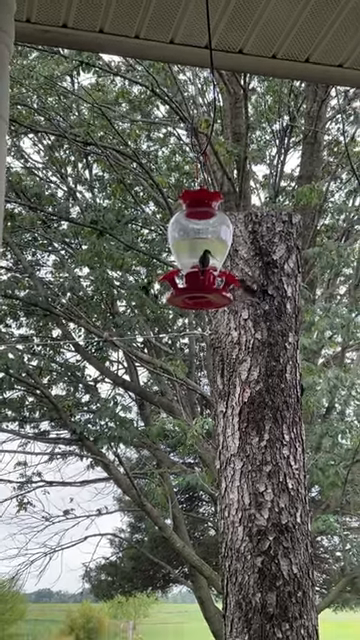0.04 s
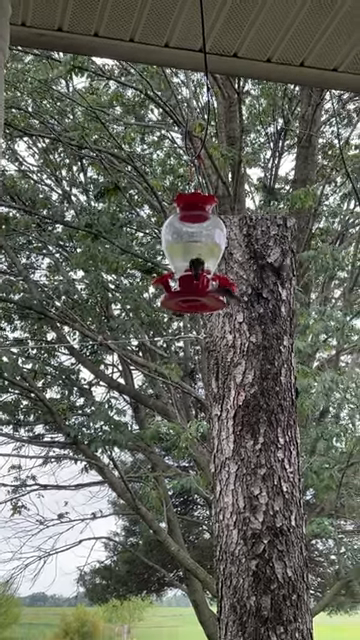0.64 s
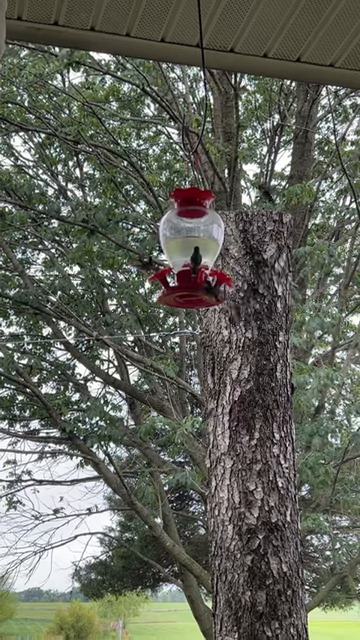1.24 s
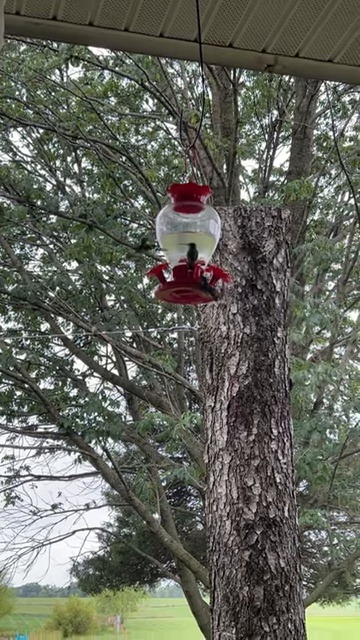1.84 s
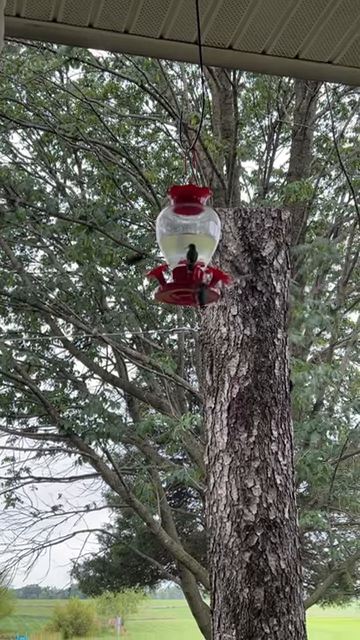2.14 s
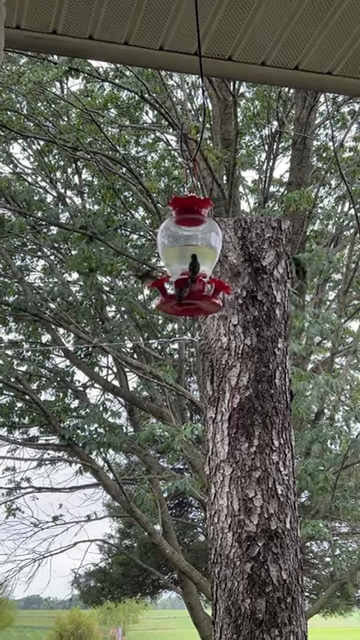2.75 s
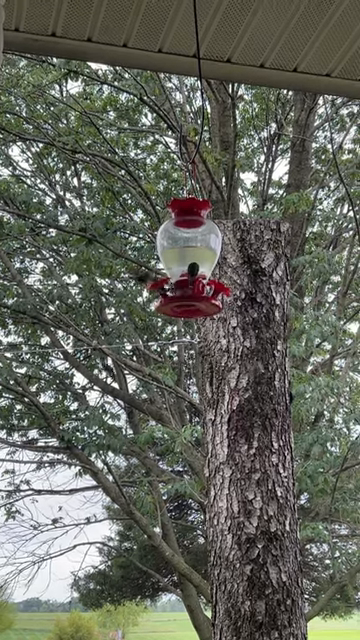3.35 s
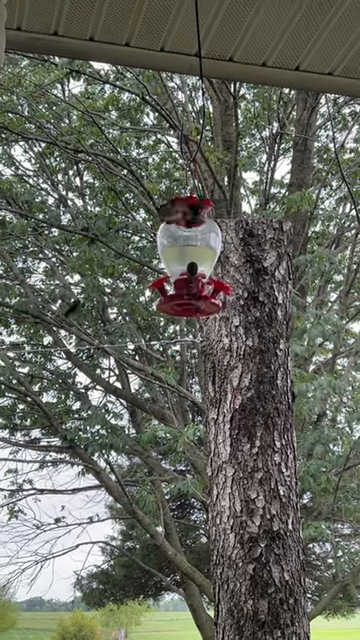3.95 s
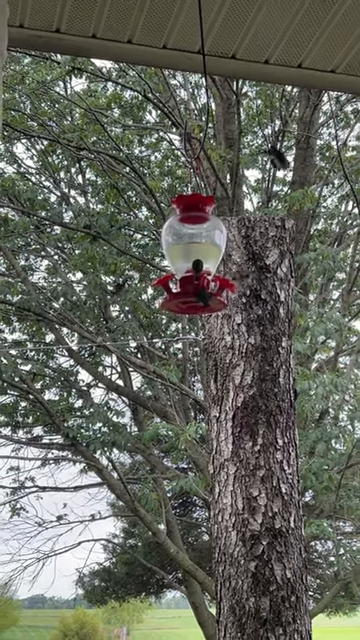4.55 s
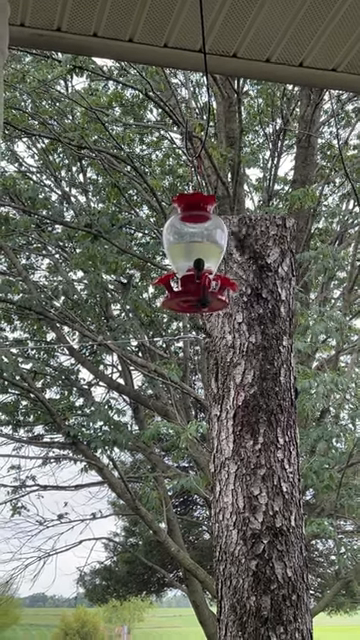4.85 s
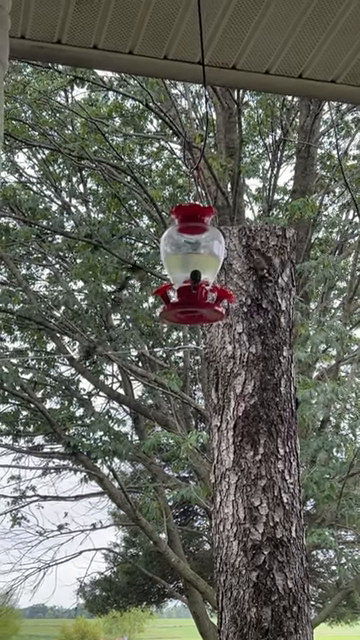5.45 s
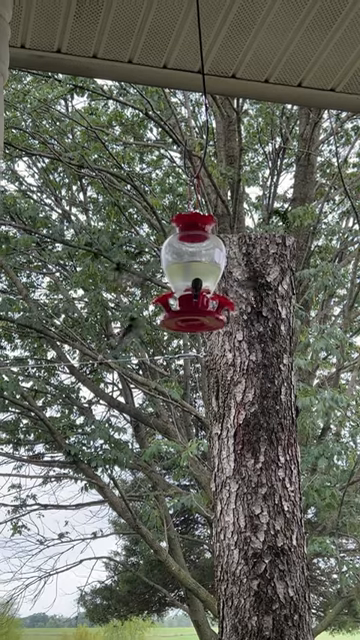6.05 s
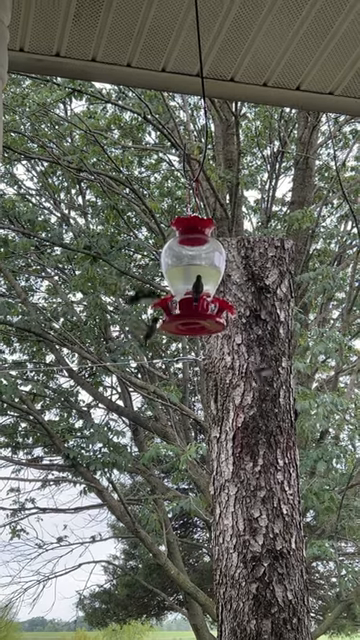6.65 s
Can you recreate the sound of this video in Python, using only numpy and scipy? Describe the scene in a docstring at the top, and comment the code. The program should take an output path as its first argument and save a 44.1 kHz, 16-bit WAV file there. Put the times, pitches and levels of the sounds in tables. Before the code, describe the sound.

Several hummingbirds hover close to the microphone on a porch, their wings making a low, wavering hum that swells with a soft swish as they dart past. They trade thin high squeals, raspy scolds and quick chips, which get busier in the second half. Insects shrill steadily in the trees, and a farther bird whistles briefly midway.

```python
"""At the edge of a porch roof, hummingbirds crowd a hanging feeder.
Insects shrill in the trees, a soft rush comes and goes, and another bird whistles farther off.
Many wings beat at slightly different rates, making a wavering hum and a swish of feathers.
The birds squeal, rasp and chip at each other, and the porch adds a short echo to the calls.
About half a second in, the whole sound drops out for an instant."""
import sys
import numpy as np
from scipy import signal
from scipy.fft import rfft, irfft
from scipy.io import wavfile
from scipy.ndimage import map_coordinates

SR = 44100
rng = np.random.default_rng(int(sys.argv[2]) if len(sys.argv) > 2 else 0)


def wav_out(sig):
    """Save sig, one row per channel (or a flat mono array), as 16-bit PCM at SR to the path in sys.argv[1]."""
    wavfile.write(sys.argv[1], SR, np.round(np.clip(np.atleast_2d(sig).T, -1, 1) * 32767).astype(np.int16))


N = 296352
TIME = np.arange(N) / SR
TREBLE_LIMIT_HZ = 15700


def gain_of(db):
    """Turns decibels into a number to multiply a sound by."""
    return 10 ** (np.asarray(db) / 20)


def unit_level(x):
    """Scales a sound to an average (rms) level of one."""
    return x / np.sqrt(np.mean(x ** 2) + 1e-20)


def level_at(colour, hz):
    """Looks up the decibels at a frequency in a table of tone colour."""
    table_hz, db = np.transpose(colour)
    return np.interp(np.log(hz + 1), np.log(table_hz + 1), db)


def follow(rows):
    """Joins a table's points in time with straight lines, one curve per column."""
    times, *columns = np.transpose(rows)
    return [np.interp(TIME, times, column) for column in columns]


def add(mix, start_s, sound):
    """Mixes a sound in at its start time."""
    part = mix[max(round(start_s * SR), 0):][:len(sound)]
    part += sound[:len(part)]


def drift(rate_hz, size=N):
    """A random wander of about plus or minus one that turns rate_hz times a second."""
    points = rng.standard_normal(2048)
    position = np.arange(size) * rate_hz / SR
    return map_coordinates(points, [position], order=1, mode="wrap") * np.sqrt(3 / 2)


def coloured(x, colour):
    """Gives a sound a tone colour, at an average level of one."""
    hz = np.fft.rfftfreq(len(x), 1 / SR)
    return unit_level(irfft(rfft(x) * gain_of(level_at(colour, hz)), len(x)))


def noise(colour, size=N):
    """Steady noise with a tone colour."""
    return coloured(rng.standard_normal(size), colour)


def porch_echo(x, echo_db, decay_s, dull_hz=9000, bounce_db=-13):
    """Adds three early bounces off roof and wall, then a short, duller tail."""
    t = np.arange(SR // 2) / SR
    clicks = rng.choice([-1, 1], len(t)) * (rng.random(len(t)) < 2000 / SR)
    tail = clicks * (t > .004) * gain_of(-60 * t / decay_s)
    tail /= np.linalg.norm(tail)
    echo = gain_of(echo_db) * signal.lfilter(*signal.butter(1, dull_hz, fs=SR), tail)
    for delay_s in rng.uniform(.005, .024, size=3):
        echo[round(delay_s * SR)] += gain_of(bounce_db)
    return x + signal.fftconvolve(x, echo)[:N]


# How loud the faraway rush is: time_s, level_db
RUSH_LOUDNESS = [(0, -73.5), (.4, -68.5), (1.2, -85), (2.7, -95), (3.4, -71), (4.5, -92.5), (6.72, -76.5)]

def distant_rush(hz=950):
    """A soft band of noise from far away that comes and goes."""
    db, = follow(RUSH_LOUDNESS)
    band = [(hz / 2, -35), (hz * .85, -3), (hz * 1.1, 0), (hz * 1.2, -20), (hz * 3, -60)]
    return gain_of(db) * noise(band)


# Tone colour of the insects: frequency_hz, relative_db
INSECT_COLOUR = [(4000, -43), (5500, -15.5), (6400, -11), (6950, 1), (7150, -2.5), (7380, 1), (7750, -1.5),
                 (8200, -9), (8550, -8.5), (9500, -21.5), (11000, -45), (13700, -30), (14600, -26),
                 (15600, -32)]
# How their loudness changes: time_s, relative_db
INSECT_LOUDNESS = [(0, -61), (3, -62), (6.72, -62.5)]

def insects(chorus_db=6, singer_db=-3, singer_hz=7390, flicker_db=1.3):
    """A shrill chorus, with one nearer singer pulsing through it."""
    db, = follow(INSECT_LOUDNESS)
    chorus = noise(INSECT_COLOUR) * gain_of(chorus_db + flicker_db * drift(40))
    throb_hz = 24.8 * (1 + .04 * drift(4))
    throb = (1 + np.cos(2 * np.pi * np.cumsum(throb_hz) / SR)) ** 2
    # a narrow band of noise around the singer's pitch
    shrill = (drift(230) + 1j * drift(230)) * np.exp(2j * np.pi * singer_hz * TIME)
    return gain_of(db) * (chorus + gain_of(singer_db) * unit_level(throb * shrill.real))


def bird_note(pitch_hz, db, octave_db, waver, flutter_db, crack_hz):
    """A fluttering tone and its octave; pushed below crack_hz, it turns hoarse."""
    size = len(pitch_hz)
    hoarse = .05 * np.clip(10 * (1 - pitch_hz / crack_hz), 0, 1)
    jitter = waver * drift(400, size) + hoarse * drift(1200, size)
    phase = 2 * np.pi * np.cumsum(pitch_hz * (1 + jitter)) / SR
    level = gain_of(db + flutter_db * drift(135, size)) * signal.windows.tukey(size, .3)
    return level * (np.sin(phase) + gain_of(octave_db) * np.sin(2 * phase))


# A whistled phrase: start_s, length_s, first_hz, middle_hz, last_hz, relative_db
WHISTLE_NOTES = [(3.508, 0.082, 3070, 2475, 2340, -53.5), (3.599, 0.105, 2320, 2410, 2420, -58.5),
                 (3.75, 0.107, 2280, 2415, 2580, -62.5)]

def far_whistles():
    """A farther bird whistles one falling note, then two gently rising ones."""
    out = np.zeros(N)
    for start_s, length_s, *pitches_hz, db in WHISTLE_NOTES:
        curve = np.polyfit([0, .5, 1], pitches_hz, 2)
        pitch_hz = np.polyval(curve, np.linspace(0, 1, round(length_s * SR)))
        note = bird_note(pitch_hz, db, octave_db=-28, waver=.01, flutter_db=3, crack_hz=2200)
        add(out, start_s, note)
    return out


def far_chips(chips_per_s=7):
    """Faint, random chatter from birds waiting in the trees."""
    out = np.zeros(N)
    for when, high, loud in rng.random((round(chips_per_s * N / SR), 3)):
        db = -66 + 8 * (loud - .5)
        add(out, when * N / SR, chip(hz=1700 * 2.5 ** high, db=db, ring_db=db - 10))
    return out


def wings(beat_hz, tones_db, wander, shimmer):
    """Wings hum at whole multiples of their beat; each tone swells and fades as the bird turns."""
    step = 10  # low tones need only every tenth sample
    wavering_hz = beat_hz * (1 + wander * (drift(6) + 1.4 * drift(22)))
    beats = np.cumsum(wavering_hz)[::step] / SR
    hum = 0
    for k, db in enumerate(tones_db, 1):
        facing = 1 + shimmer * drift(9 * step, len(beats))
        hum += gain_of(db) * facing * np.sin(2 * np.pi * (k * beats + rng.random()))
    return unit_level(signal.resample_poly(hum, step, 1)[:N])


# Birds darting past: closest_s, half_power_s (sign ignored), hum_relative_db, swish_relative_db
FLY_PASTS = [(.03, 0.35, -69, -66), (.25, 1.7, -57.5, -72), (.62, 0.09, -52.5, -60), (.85, -0.03, -51, -75),
             (.87, -0.06, -50.5, -87), (1.7, 0.16, -53, -71), (1.86, 0.14, -53.5, -60.5),
             (2.5, 0.25, -52, -67.5), (3.06, 0.09, -54.5, -61.5), (3.66, 0.12, -52, -64.5),
             (4.08, 0.11, -57, -59.5), (4.38, 0.03, -52.5, -69), (5.0, 0.09, -53, -61),
             (5.4, 0.2, -52.5, -64), (6.62, 0.3, -51, -64.5)]

def fly_past_levels(hum_floor_db=-55.5, swish_floor_db=-90):
    """Hum and swish in decibels as birds fly straight past: twice as far, a quarter of the power."""
    hum_power, swish_power = gain_of(hum_floor_db) ** 2, gain_of(swish_floor_db) ** 2
    for closest_s, half_power_s, hum_db, swish_db in FLY_PASTS:
        distance_squared = 1 + ((TIME - closest_s) / half_power_s) ** 2
        hum_power += gain_of(hum_db) ** 2 / distance_squared
        swish_power += gain_of(swish_db) ** 2 / distance_squared
    return 10 * np.log10(hum_power), 10 * np.log10(swish_power)


# The usual wingbeat of each bird in the flock: beat_hz
FLOCK_BEATS = [42.76, 46.73, 49.4, 51.83, 53.1, 56.8, 60.47]
# Tone colour of their hum: frequency_hz, relative_db
HUM_COLOUR = [(35, -42), (52, -9.5), (95, 4.5), (150, -1.5), (210, 2.5), (380, -3), (520, -11.5),
              (900, -39)]
# Tone colour of the air they stir: frequency_hz, relative_db
AIR_COLOUR = [(30, -34), (60, 3), (130, 2), (330, 3), (480, -6.5), (680, -14.5), (1300, -19.5),
              (15500, -54)]

def flock(trim_db=-2.5, air_db=-59.5, air_swell=1.95):
    """Many wingbeats drift in and out of step; the rush of air swells as birds pass."""
    db, _ = fly_past_levels()
    multiples = np.arange(1, 17)
    hum = sum(wings(hz, level_at(HUM_COLOUR, hz * multiples), wander=.025, shimmer=.49)
              for hz in FLOCK_BEATS)
    air = gain_of(air_db + air_swell * (db - db.mean())) * noise(AIR_COLOUR)
    return gain_of(db + trim_db) * unit_level(hum) + air


# A bird hovering close by: time_s, beat_hz, relative_db
NEAR_HOVER = [(0, 52.1, -65), (2.25, 46.5, -58.5), (2.9, 49.6, -59), (3.4, 53, -63), (4.05, 53.97, -58.5),
              (4.8, 53.23, -57), (5.5, 52.3, -60), (6.3, 54.8, -57), (6.72, 55.65, -62)]
# The tones in its hum: multiple_of_beat, relative_db
NEAR_TONES = [(1, -23), (2, -0.5), (3, 1.5), (4, 6.5), (5, -14), (7, -13.5), (10, -18), (14, -52)]
# A second bird with a deeper hum: time_s, beat_hz, relative_db
DEEP_HOVER = [(0, 53, -73), (2.05, 57.2, -68), (3.5, 58.2, -69), (4.4, 57.7, -61), (6.72, 53, -63)]

def near_birds(trim_db=-1, deep_db_per_octave=-9):
    """The two closest birds hum, each changing its wingbeat and loudness as it hovers."""
    multiples = np.arange(1, 15)
    near_hz, near_db = follow(NEAR_HOVER)
    deep_hz, deep_db = follow(DEEP_HOVER)
    near = wings(near_hz, level_at(NEAR_TONES, multiples), wander=.025, shimmer=.41)
    deep = wings(deep_hz, deep_db_per_octave * np.log2(multiples), wander=.015, shimmer=.28)
    return gain_of(near_db + trim_db) * near + gain_of(deep_db + trim_db) * deep


# Tone colour of swishing feathers: frequency_hz, relative_db
SWISH_COLOUR = [(400, -25), (700, 4), (1300, 1), (2100, 0.5), (3200, 1), (5000, 2.5), (9000, -5),
                (15000, -12)]

def feathers(trim_db=-1, pulse_depth=.19, flicker_db=1):
    """A faint swish on every wing stroke, strongest when a bird darts past."""
    _, db = fly_past_levels()
    beat_hz, _ = follow(NEAR_HOVER)
    strokes = unit_level(1 + pulse_depth * np.cos(2 * np.pi * np.cumsum(beat_hz) / SR))
    return gain_of(db + trim_db + flicker_db * drift(23)) * strokes * noise(SWISH_COLOUR)


# Birds swerving close by: loudest_s, swell_s, strongest_tone_hz, level_db
CLOSE_SWERVES = [(.74, .1, 110, -55.5), (2.779, 0.048, 289, -53.5), (4.019, 0.056, 212.7, -49.5),
                 (4.43, .06, 211, -53), (4.881, 0.039, 220.4, -53.5), (5.27, 0.065, 109.3, -51.5),
                 (5.679, 0.061, 300, -53.5), (6.22, .06, 218.3, -55)]

def swerves(rough_beat_hz=53, pitch_bend=.02, neighbour_db=-9):
    """The hum swells with one tone standing out, and its pitch falls as the bird turns away."""
    out = np.zeros(N)
    for loudest_s, swell_s, hz, db in CLOSE_SWERVES:
        path = np.linspace(-3, 3, round(6 * swell_s * SR))  # zero is the closest point
        strongest = round(hz / rough_beat_hz)
        beat_hz = hz / strongest * (1 - pitch_bend * np.tanh(path) + .04 * drift(18, len(path)))
        beats = np.cumsum(beat_hz) / SR
        flutter = unit_level(1 + .55 * drift(24, len(path)))
        hum = 0
        for k in range(2, 9):
            strength = gain_of(neighbour_db * abs(k - strongest))
            hum += strength * np.sin(2 * np.pi * (k * beats + rng.random()))
        swell = gain_of(db) * np.exp(-path ** 2)
        add(out, loudest_s - 3 * swell_s, swell * flutter * unit_level(hum))
    return out


# Thin squeals: start_s, length_s, pitch_hz, glide_hz_per_s, relative_db, octave_db
SQUEAL_CALLS = [(0.049, 0.032, 7330, 2491, -41, -20.5), (0.085, 0.046, 7330, -6000, -40.5, -26),
                (0.265, 0.096, 7100, -300, -33, -10.5), (0.939, 0.063, 7780, -500, -44, -32),
                (1.737, 0.096, 7400, -3000, -45, -9), (2.462, 0.088, 5780, -4000, -47, -26),
                (2.541, 0.14, 5390, -900, -57, -16), (2.863, 0.062, 6800, -6000, -49.5, -11),
                (3.77, .12, 7190, -1200, -47, -10), (3.988, 0.045, 7720, -1500, -45, -28),
                (4.022, 0.06, 6760, 498, -44, -17), (4.635, 0.027, 5050, 3507, -41.5, -23),
                (5.579, 0.027, 5000, 16982, -54, -23), (5.618, 0.046, 5220, 9000, -47.5, -20),
                (6.212, 0.046, 7080, 3508, -35.5, -4), (6.269, 0.031, 7070, -2000, -33, -13.5),
                (6.675, 0.054, 6180, 27994, -46.5, -9)]

def squeals(peak_at=.42, pitch_sag=.0155, ends_db=-11):
    """Pitch and loudness rise and fall in one arch, on top of each squeal's own glide."""
    out = np.zeros(N)
    for start_s, length_s, hz, glide, db, octave_db in SQUEAL_CALLS:
        progress = np.linspace(0, 1, round(length_s * SR))
        off_peak = np.interp(progress, [0, peak_at, 1], [1, 0, 1])
        pitch_hz = hz * (1 - pitch_sag * off_peak ** 2) + glide * length_s * (progress - .5)
        arch_db = db + ends_db * np.sqrt(off_peak)
        note = bird_note(pitch_hz, arch_db, octave_db, waver=.009, flutter_db=3.5, crack_hz=5770)
        add(out, start_s, note)
    return out


def throat_voice(pitch_hz, throat_hz, width_octaves=.6, leak=.3):
    """The throat favours the overtones near throat_hz; a little of the rest leaks past."""
    phase = 2 * np.pi * np.cumsum(pitch_hz) / SR
    out = 0
    for k in range(1, 8):
        octaves_away = np.log2(k * pitch_hz / throat_hz)
        passed = np.exp(-.5 * (octaves_away / width_octaves) ** 2) + leak / k ** 1.3
        treble_fade = 1 / (1 + (k * pitch_hz / 12500) ** 6)
        out += passed * treble_fade * np.sin(k * phase + 2 * np.pi * rng.random())
    return unit_level(out)


# Harsh scolding calls: start_s, length_s, pitch_hz, throat_hz, jitter_share, relative_db
RASP_CALLS = [(0.231, 0.07, 6180, 6900, 0.17, -56), (0.364, 0.07, 3100, 6460, 0.17, -51),
              (0.522, 0.089, 6500, 7800, 0.12, -57.5), (1.189, 0.1, 6420, 8500, 0.077, -57.5),
              (2.528, 0.094, 4840, 6500, 0.15, -55.5), (2.689, 0.073, 2906, 4640, 0.21, -56.5),
              (3.832, 0.085, 6530, 8500, .17, -56.5), (4.016, 0.074, 4800, 6800, 0.32, -58.5),
              (4.38, 0.061, 4300, 5660, .27, -55.5), (4.567, 0.031, 4680, 5200, 0.13, -56),
              (4.642, .04, 4490, 5800, 0.26, -50.5), (4.91, 0.05, 2900, 5530, 0.23, -48.5),
              (5.629, 0.095, 4750, 6400, 0.15, -54), (5.788, 0.052, 2643, 5000, 0.21, -52),
              (6.658, 0.056, 5560, 6700, .19, -55.5)]

def rasps(fall=.25):
    """The voice breaks up: its falling pitch jitters so fast that the tones smear into a hiss."""
    out = np.zeros(N)
    for start_s, length_s, hz, throat_hz, jitter, db in RASP_CALLS:
        t = np.arange(0, length_s, 1 / SR)
        pitch_hz = hz * np.exp(-fall * (t / length_s - .5) + jitter * drift(3000, len(t)))
        grain = unit_level(1 + .23 * drift(503, len(t)))
        swell = gain_of(db) * signal.windows.tukey(len(t), .5)
        add(out, start_s, swell * grain * throat_voice(pitch_hz, throat_hz))
    return out


# Tone colours of a chip's voice, hoarse hiss and ringing throat: frequency_hz, relative_db
VOICE_COLOUR = [(2200, 0), (4300, -2), (9000, -11), (15500, -32)]
HISS_COLOUR = [(600, -29), (1900, -5), (4500, -0.5), (8500, -3), (15500, -25)]
THROAT_COLOUR = [(2000, -35), (4600, -15.5), (5900, 4), (7200, -11), (15000, -27)]
CHIP_PEAK_S = .025

def chip(hz, db, ring_db, rise_s=.0066, sweep_s=.013):
    """A quick downward sweep that breaks up into hiss and rings the throat."""
    t = np.arange(SR // 12) / SR - CHIP_PEAK_S  # zero at the peak
    hoarse = np.clip(.4 + .1 * (ring_db - db), 0, 1)  # a forced, ringing chip is hoarser
    fade_s = .0058 + .0022 * hoarse
    swell = np.where(t < 0, np.exp(-.5 * (t / rise_s) ** 2), 1 / np.cosh(t / fade_s))
    fall = 17 * rng.uniform(.7, 1.3) * np.minimum(t, sweep_s)
    jitter = (.02 + .04 * hoarse) * drift(1498, len(t))
    pitch_hz = hz * np.exp(jitter - fall)
    cycles = np.cumsum(pitch_hz) / SR
    tone = 0
    for k in range(1, int(TREBLE_LIMIT_HZ / hz) + 1):
        strength = gain_of(level_at(VOICE_COLOUR, k * pitch_hz))
        tone += strength * np.sin(2 * np.pi * (k * cycles + rng.random()))
    voice = np.sqrt(1 - hoarse) * unit_level(tone) + np.sqrt(hoarse) * noise(HISS_COLOUR, len(t))
    ring = gain_of(ring_db) * coloured(voice, THROAT_COLOUR)
    grain = unit_level(1 + .35 * drift(500, len(t)))
    return swell * grain * (gain_of(db) * voice + ring)


# Short falling chips: loudest_s, pitch_hz, voice_relative_db, ring_relative_db
CHIP_CALLS = [(.475, 2150, -65.5, -58), (.62, 1600, -66, -62), (.743, 2770, -58, -68),
              (.795, 2800, -65, -76), (0.849, 2800, -66.5, -83), (.91, 2760, -66, -80),
              (.975, 2730, -67.5, -75), (1.095, 2100, -56.5, -64), (1.467, 2850, -60, -64),
              (1.53, 2730, -61.5, -70), (1.596, 2690, -61.5, -66), (1.913, 2010, -58, -59.5),
              (1.98, 2050, -63, -68.5), (2.06, 2300, -62.5, -70), (2.16, 2200, -63.5, -61),
              (2.507, 1950, -58.5, -59.5), (2.717, 1850, -60, -57), (2.81, 2090, -62, -61),
              (2.904, 2100, -61, -62), (3.164, 2020, -59.5, -63), (3.694, 2230, -59, -64),
              (3.809, 4500, -65, -79), (3.991, 2584, -67, -57), (4.046, 5000, -58, -66),
              (4.173, 2400, -61, -60), (4.238, 2350, -62, -63), (4.309, 2300, -62, -62),
              (4.515, 2203, -58, -60), (4.617, 2200, -57, -58), (4.775, 2004, -55, -52.5),
              (4.849, 1953, -54, -52), (5.034, 2002, -54, -49.5), (5.106, 1950, -57.5, -52),
              (5.184, 1950, -57.5, -52.5), (5.264, 2004, -59.5, -54), (5.391, 1900, -56.5, -61),
              (5.474, 1950, -58.5, -59), (5.767, 2090, -60, -66), (5.904, 2210, -55, -64),
              (5.989, 2060, -62, -70), (6.076, 2000, -57, -63), (6.157, 1940, -66, -71),
              (6.331, 2050, -58, -67), (6.437, 2120, -57, -65.5), (6.525, 2106, -57, -58.5)]

def feeder_chips():
    """The birds around the feeder chatter in quick runs of chips."""
    out = np.zeros(N)
    for loudest_s, hz, db, ring_db in CHIP_CALLS:
        add(out, loudest_s - CHIP_PEAK_S, chip(hz, db, ring_db))
    return out


def scene():
    """Calls echo under the porch roof, over wing hum and insects; left and right are the same."""
    scolding = gain_of(.17) * porch_echo(feeder_chips() + rasps(), echo_db=-3, decay_s=.29)
    squealing = gain_of(1) * porch_echo(squeals(), echo_db=-3, decay_s=.36)
    far_calls = porch_echo(far_whistles() + far_chips(), echo_db=-.5, decay_s=.4, dull_hz=5000)
    flight = near_birds() + swerves() + flock() + feathers()
    background = insects() + distant_rush() + gain_of(-4.5) * far_calls
    mix = background + flight + squealing + scolding
    return np.array([mix, mix])


# A brief hush in the whole sound: time_s, gain
BRIEF_HUSH = [(.488, 1), (.496, .004), (.515, .004), (.521, 1)]

def record(dry):
    """The sound drops out for an instant, and the very highest treble is cut away."""
    gain, = follow(BRIEF_HUSH)
    treble_cut = signal.firwin(511, TREBLE_LIMIT_HZ, window=("kaiser", 9), fs=SR)
    return signal.oaconvolve(dry * gain, treble_cut[None], "same")


dry = scene()
out = record(dry)
wav_out(out)
```